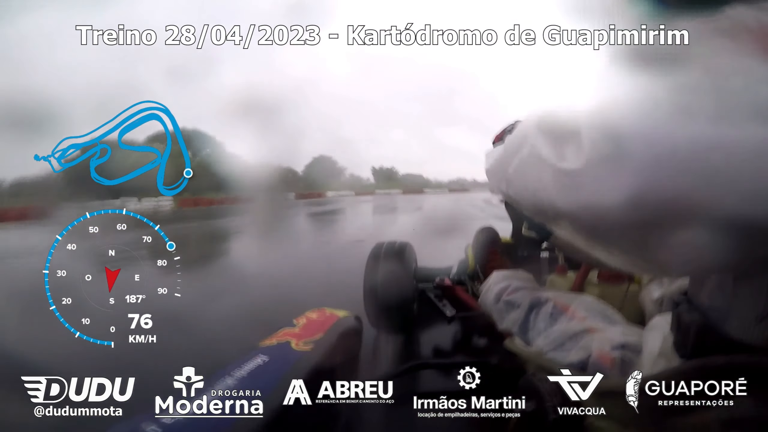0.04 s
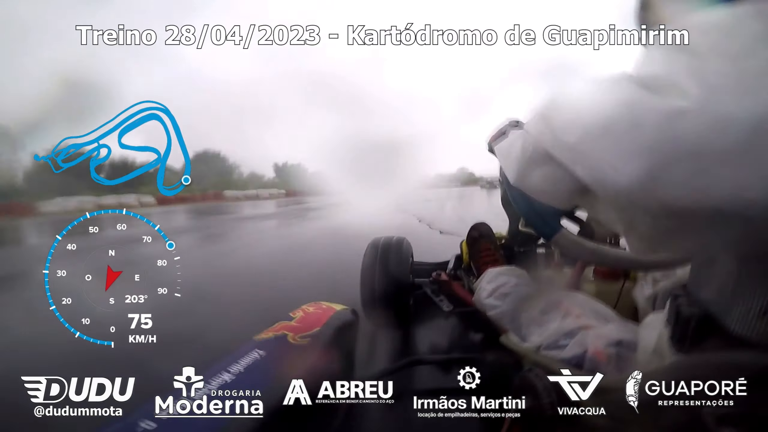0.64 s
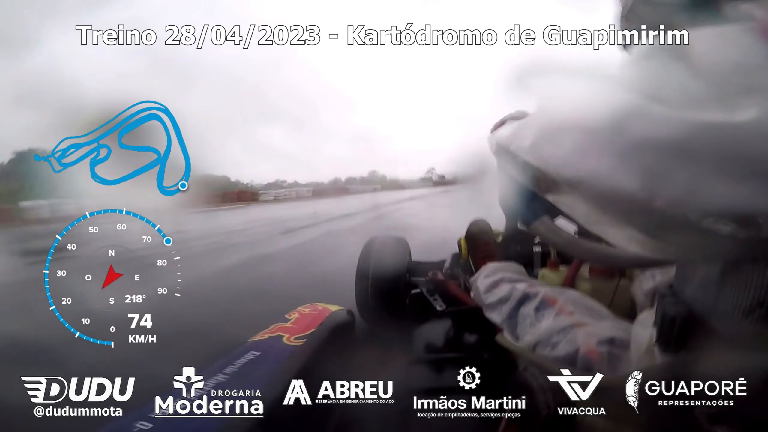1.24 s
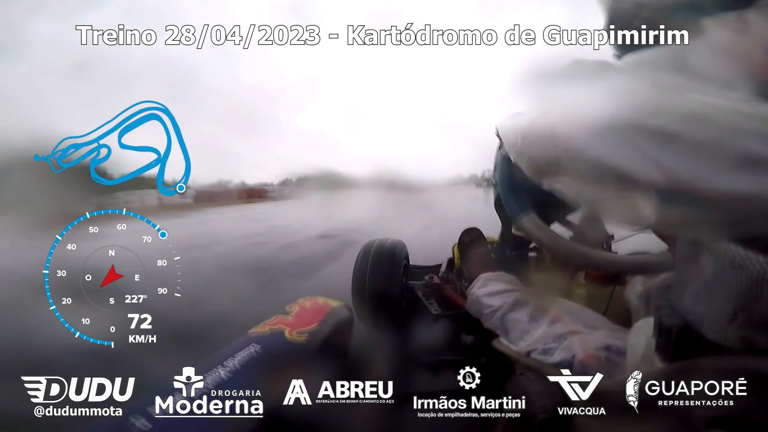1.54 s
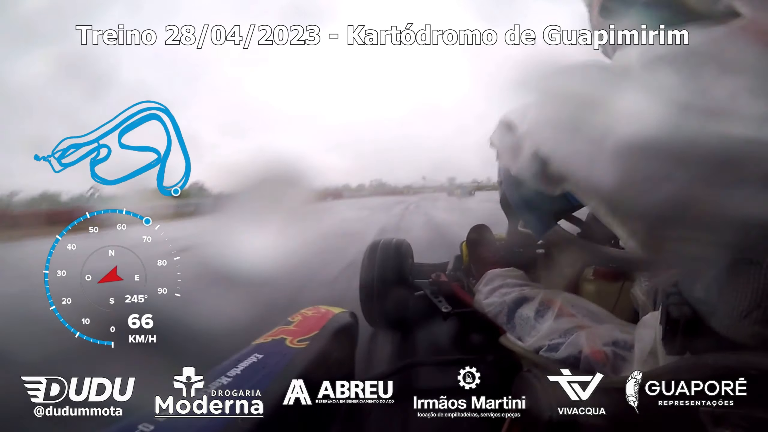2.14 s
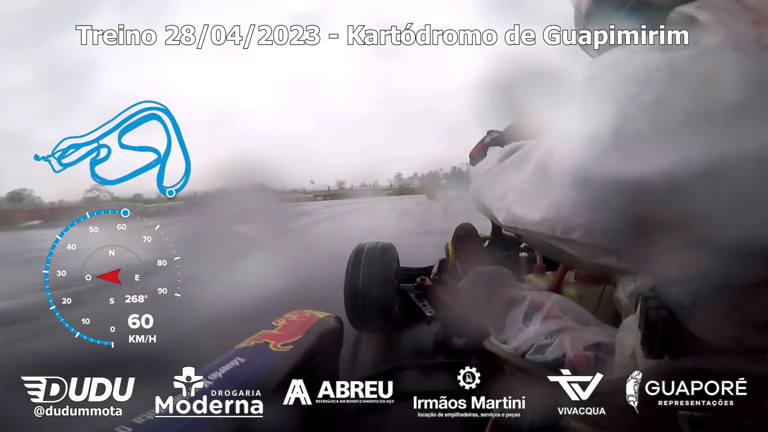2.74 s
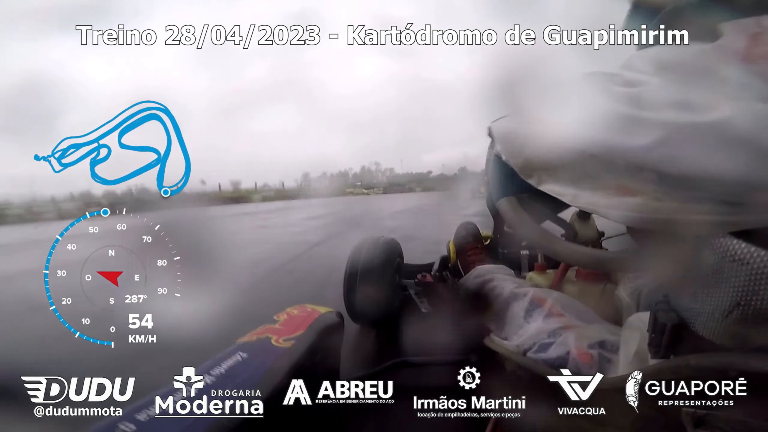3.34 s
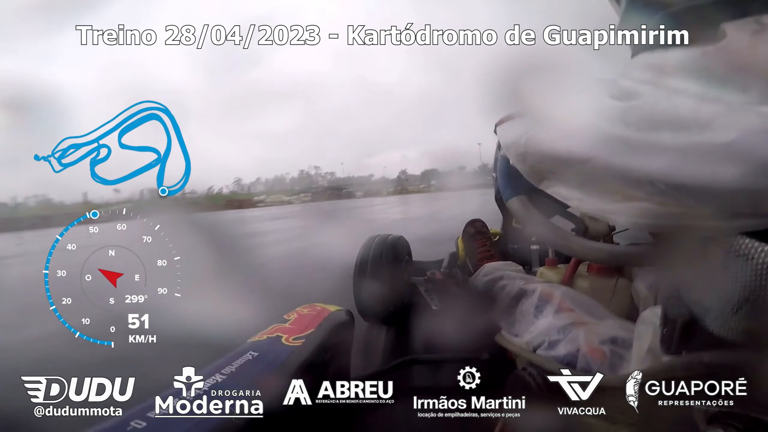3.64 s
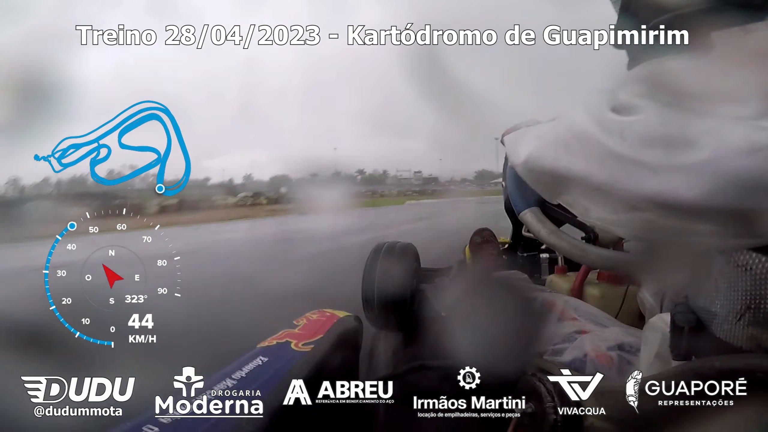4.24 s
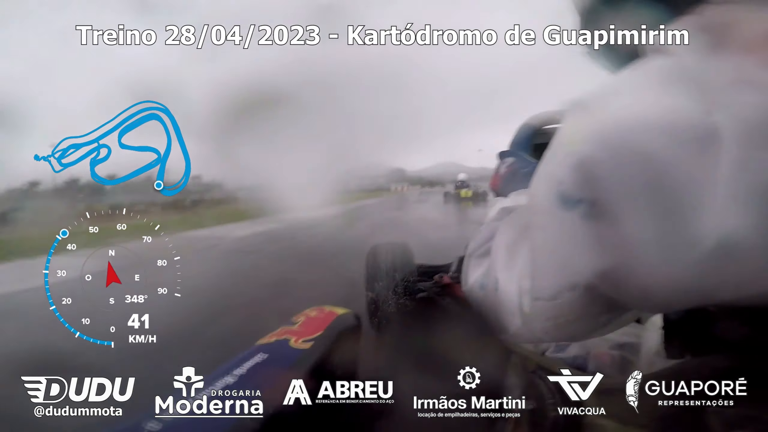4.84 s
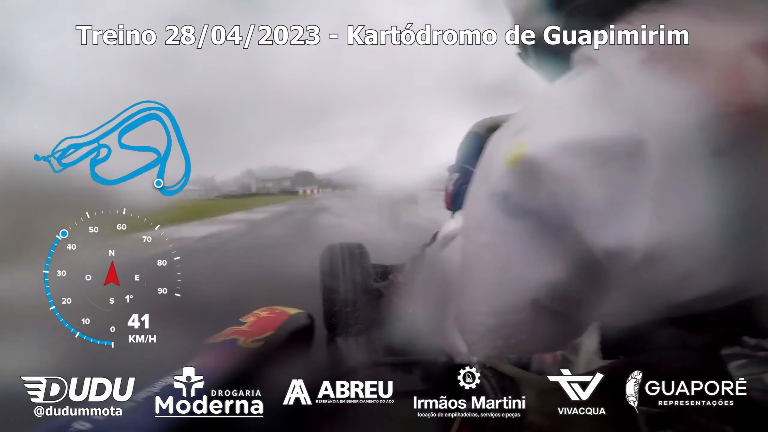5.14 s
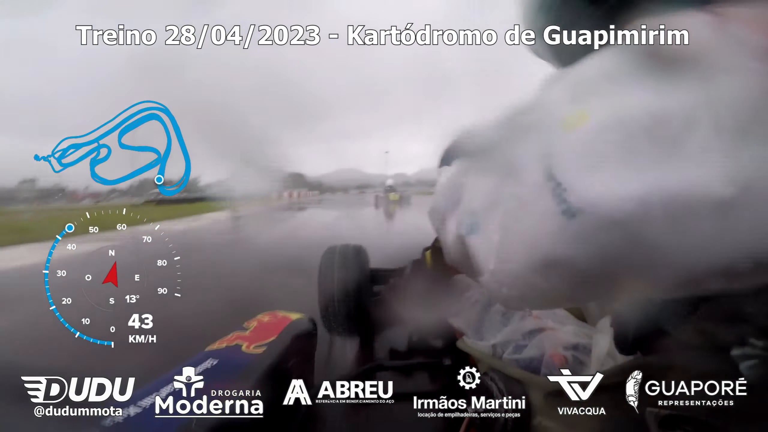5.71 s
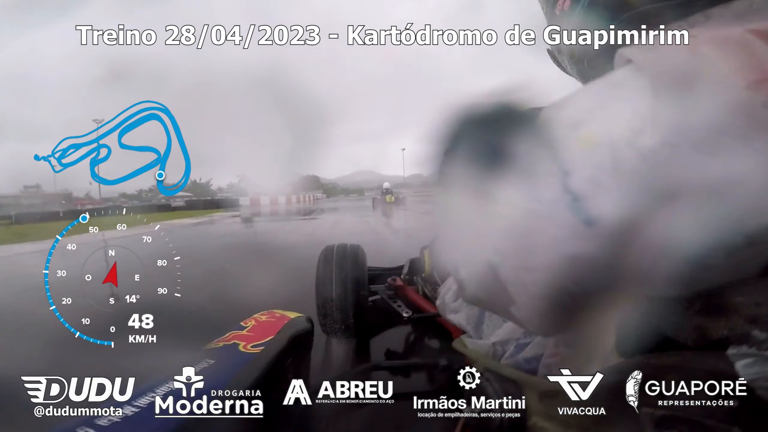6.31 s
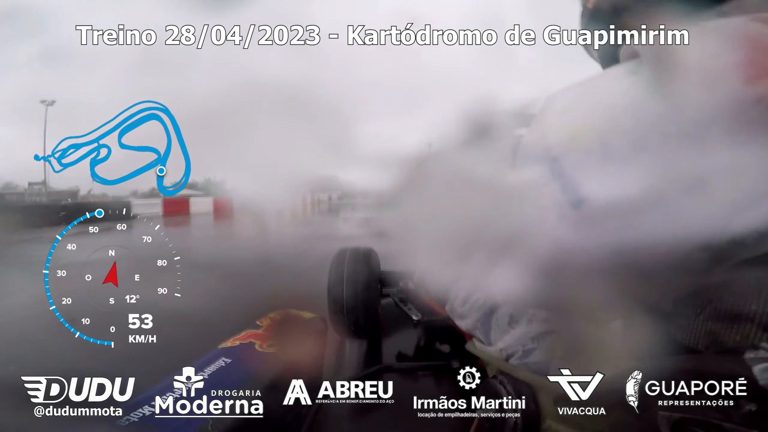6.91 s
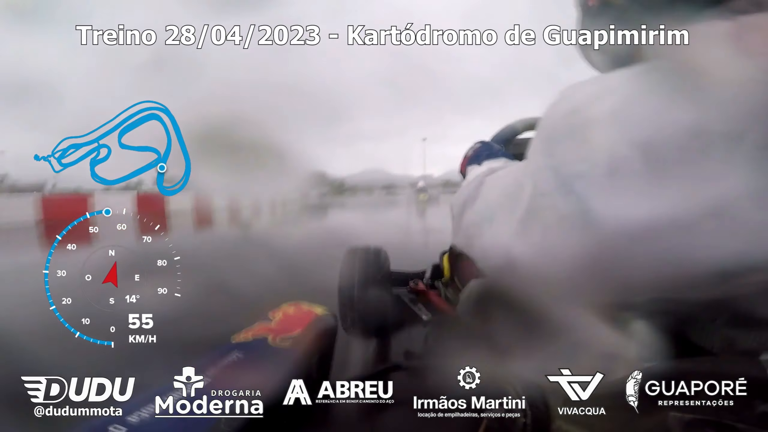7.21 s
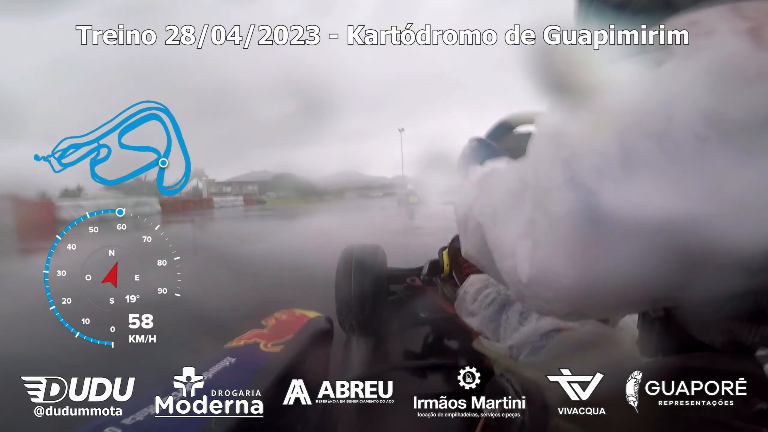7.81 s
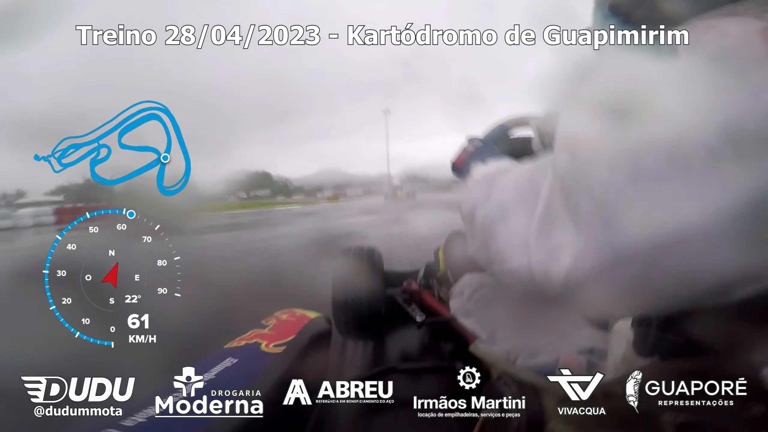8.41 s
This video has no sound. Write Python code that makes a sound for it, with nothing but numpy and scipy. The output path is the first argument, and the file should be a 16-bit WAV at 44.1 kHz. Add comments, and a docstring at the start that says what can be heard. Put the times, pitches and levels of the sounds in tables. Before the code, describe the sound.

A four-stroke racing kart engine drones on board, boxy through a waterproof camera case that chatters constantly over chain clatter and low road rumble. The revs start high, with sharp knocks from the mount during the first two seconds, the hardest at 0.3 seconds. From about 1 second the pitch sinks, and the engine goes slack near 2 seconds. A wavering metallic chain rasp and tyre scrub come forward through the bend, with dull clunks and small splashes between 3 and 4 seconds. The revs bottom out around 4.3 seconds, followed by a short wash of water underneath. From about 5.2 seconds the engine pulls away in hard, ringing chugs, rising steadily in pitch as the scrub drops away. Deep wind buffets around 7 seconds, and more knocks land just after 8 seconds. A faint wet hiss runs throughout.

```python
"""A four-stroke racing kart engine, heard on board: it slows through a long, wet bend, then pulls away.
Its firings drone through the frame and rattle a camera's waterproof case, which knocks on its mount.
The chain clatters and rasps, the tyres scrub and throw spray, and wind and asphalt rumble underneath.
Everything is heard through the case's resonances and a limiter."""
import sys
import numpy as np
from scipy.fft import rfft, irfft, next_fast_len
from scipy.io import wavfile
from scipy.ndimage import uniform_filter1d, minimum_filter1d, map_coordinates

SR = 44100
rng = np.random.default_rng(int(sys.argv[2]) if len(sys.argv) > 2 else 0)


def log_audio(samples):
    """Write samples as a 16-bit WAV file to the path given in sys.argv[1]."""
    # one column per channel
    frames = np.atleast_2d(samples).T
    # limit to full scale, then quantise
    limited = np.clip(frames, -1, 1)
    pcm = np.round(limited * 32767).astype(np.int16)
    wavfile.write(sys.argv[1], SR, pcm)


N = 373086

# The revs sink through the bend, blip, then climb. Each row: time in seconds, firings a second.
REVS = [(0, 46.42), (.9, 45.13), (1.35, 42.01), (2.0, 38.82), (2.3, 37.93), (2.6, 34.25), (3.4, 32.16),
        (3.7, 30.05), (4.0, 28.88), (4.3, 26.92), (4.65, 28.1), (5.1, 28.66), (5.28, 27), (5.5, 28.21),
        (6.1, 30.62), (7.0, 34.04), (8.46, 38.44)]
# How hard the engine pulls. Each row: time in seconds, load from 0 to 1.
LOAD = [(0, 0.31), (.8, 0.26), (1.15, 0.7), (1.45, 0.6), (1.8, 0.16), (4.25, 0.11), (4.55, 0.26),
        (5.12, 0.21), (5.3, 0.62), (6.4, 0.6), (7.1, 0.48), (7.4, 0.73), (7.9, 0.8), (8.46, 0.41)]
# How the frame colours the drone. Each row: frequency in Hz, gain in dB.
FRAME_EQ = [(25, -7), (85, -17.5), (110, -18.5), (142, -9.5), (175, -16.5), (205, -29.5), (234, -10),
            (253, 3.5), (278, 0.5), (300, -6.5), (330, -16.5), (400, -17), (600, -33)]
# The eighth harmonic eases off as the revs rise. Each row: firings a second, gain in dB.
EIGHTH_TRIM = [(32, -1), (35, -2.5)]
# The frame's answer to the crankshaft's imbalance. Each row: frequency in Hz, gain in dB.
IMBALANCE_EQ = [(54, -32), (61, -33), (67, -41), (73, -46), (77, -27.5), (84, -28.5), (92, -35), (108, -34),
                (114, -22.5), (119, -21.5), (124, -28.5), (129, -35), (143, -43), (180, -45.5)]
# The fifth harmonic stands out when the engine lugs. Each row: firings a second, level in dB.
LUGGING = [(27, -29.5), (30, -33.5), (34, -37.5)]
def engine(cycles, firing_hz, load, boom_db):
    """Firing harmonics sweep through the frame's resonances; 2 and 4 carry the crankshaft's imbalance."""
    def harmonic(k):
        flutter = amp(wobble(18))
        return flutter * np.sin(2 * np.pi * (k * cycles + rng.random()) + 0.014 * k * wobble(22))

    eighth_db = along(EIGHTH_TRIM, firing_hz)
    drone = sum(amp(along(FRAME_EQ, k * firing_hz) + (k == 8) * eighth_db) * harmonic(k)
                for k in range(1, 15) if k not in (2, 4))
    crank = sum(amp(along(IMBALANCE_EQ, k * firing_hz)) * harmonic(k) for k in (2, 4))
    lug = amp(along(LUGGING, firing_hz)) * harmonic(5)
    climb_hz_per_s = uniform_filter1d(np.gradient(curves(REVS)[0]) * SR, size=SR // 5)
    pull_db = 2.5 * np.tanh(climb_hz_per_s / 2.2)  # more throb on rising revs, less on falling
    crank_db = pull_db + 14 * np.minimum(load, .26) - 3.4 + 1.7 * wobble(16)
    return amp(boom_db - 1.5) * np.sqrt(load) * steady(drone, .12) + amp(crank_db) * crank + lug


# Firings stand apart at low revs and merge higher up. Each row: firings a second, pulsing from 0 to 1.
PULSING = [(31, 1), (34, 0.4), (42, 0.3)]
# The dry tone of spits and ticks. Each row: frequency in Hz, gain in dB.
TICK_EQ = [(1000, 4), (2000, 0), (2800, 2), (3200, -4.5), (3600, -3.5), (4100, -3), (4600, -10),
           (5600, -10), (7500, -16.5), (12500, -48)]
def putter(cycles, firing_hz, lock):
    """Pulling at low revs, each firing starts with a crisp spit, its top dulled by the mount."""
    spits = rng.standard_normal(N) * firing_gate(cycles - 0.04, decay=.15, scatter_db=1.5)
    dulled = filtered(spits, lambda hz: amp(along(TICK_EQ, hz)) / (1 + (hz / 4200) ** 4))
    return amp(-45.5) * lock * along(PULSING, firing_hz) * unit(dulled)


# How hard the kart shakes. Each row: time in seconds, case rattle and chain clatter in relative dB.
SHAKE = [(0.0, -29, -41), (1.2, -30.5, -42.5), (1.5, -31.5, -41.5), (2.1, -30, -41), (2.9, -31.5, -42.5),
         (4.3, -30.5, -43.5), (4.4, -37, -46.5), (4.6, -31.5, -43), (5.05, -33.5, -45.5),
         (5.35, -29.5, -44), (6.4, -34, -48.5), (7.0, -29, -43), (7.35, -35.5, -48), (8.25, -27.5, -42),
         (8.46, -28.5, -39)]
# The chattering case. Each row: resonance in Hz, width in Hz, gain in dB.
CASE_MODES = [(697, 120, -11.5), (1017, 107, -5.5), (1289, 194, 1), (1460, 670, -12.5), (2020, 110, -26),
              (2870, 300, -33)]
# The mount's clearest ring. Each row: resonance in Hz, width in Hz, gain in dB.
MOUNT_MODES = [(1291, 54, 8), (653, 44, 0.5)]
# The mount's rubber seat softens each contact. Each row: frequency in Hz, gain in dB.
RUBBER_EQ = [(400, -1.5), (650, 0), (2800, 1), (4500, -15.5), (9000, -25)]
def rattle(cycles, firing_hz, lock, jolt_db):
    """The case chatters on its mount: at random, or in one ringing burst per firing under load."""
    flutter_db = 0.8 * (1 - lock) * wobble(18)
    level = amp(curves(SHAKE)[0] - 2.5 + 0.9 * jolt_db + flutter_db)
    chatter = steady(ring(impacts(2000, spread_db=1), CASE_MODES), 0.11)
    pulsing = along(PULSING, firing_hz)
    contacts = impacts(5000, spread_db=1)
    gate = firing_gate(cycles + .018 * wobble(25), decay=.25, scatter_db=.8)
    bursts = unit(contacts * (1 - pulsing + pulsing * gate))
    first_blows = np.diff(np.floor(cycles - .06 + .02 * wobble(25)), prepend=0) > 0
    chug = steady(ring(bursts + amp(-4) * pulsing * unit(first_blows * 1.0), MOUNT_MODES), 0.036)
    mount = filtered(level * np.sqrt(lock) * chug + kicks(), lambda hz: 1 / (1 + (hz / 2100) ** 4))
    return equalise(level * np.sqrt(1 - lock) * chatter + mount, RUBBER_EQ)


# The hardest firings as the kart pulls away. Each row: start in seconds, strength in dB.
KICKS = [(5.179, -24.5), (5.291, -22.5), (5.512, -19), (5.688, -24), (5.894, -22), (6.059, -22),
         (6.152, -22.5), (6.219, -22), (6.286, -21), (6.409, -27), (6.536, -23.5)]
def kicks():
    """A hard firing strikes the mount once and leaves it ringing."""
    blows = np.zeros(N)
    for start, db in KICKS:
        blows[round(start * SR)] = amp(db)
    rung = ring(blows, MOUNT_MODES)
    return rung * blows.max() / np.abs(rung).max()


# Engine drone and case boom swell and sag together. Each row: time in seconds, gain in dB.
BOOM_SWELL = [(0, 0.5), (.22, 1.5), (.4, 0), (1.0, 0), (1.2, 3), (1.41, 2), (1.49, -2.5), (1.57, 3.5),
              (1.8, 1.5), (2.05, 1.5), (2.25, -1.5), (3.0, 0), (4.0, -0.5), (4.35, 1.5), (5.0, 0),
              (5.15, 2), (5.33, 1.5), (5.62, 0.5), (5.72, 0.5), (6.2, -0.5), (6.5, 3), (6.78, 0.5),
              (6.88, -4.5), (6.96, 2), (7.15, 1.5), (7.33, -3.5), (7.62, -1.5), (8.0, 2), (8.28, -1),
              (8.4, 0)]
# The case's two low notes. Each row: resonance in Hz, width in Hz, gain in dB.
BOOM_MODES = [(241, 31.8, 1.5), (292, 55, -2.5)]
# High revs favour the upper note. Each row: firings a second, its gain in dB.
BOOM_TILT = [(27, -6), (31, -1), (40, -1.5), (46, 2)]
def case_boom(firing_hz, load, boom_db):
    """Small, dense jolts boom in the case, taking over from the drone as the load drops."""
    jolts = impacts(2000, spread_db=1.5)
    notes = ring(jolts, BOOM_MODES[:1]) - amp(along(BOOM_TILT, firing_hz)) * ring(jolts, BOOM_MODES[1:])
    boom = equalise(notes, [(100, -16.0), (200, 0.0), (235, 0.5), (330, 6.0), (700, -14.0)])
    return amp(boom_db - 2.0) * np.sqrt(1 - load) * steady(boom, 0.058)


# Hard knocks of the case on its mount. Each row: start in seconds, relative level in dB.
KNOCKS = [(.053, -27), (.103, -28), (.1925, -26), (.2135, -23.5), (.227, -28), (.2795, -25), (0.3025, -14),
          (.324, -32), (.4115, -31), (.4325, -25.5), (.641, -27), (.873, -24.5), (.883, -28),
          (.9405, -27.5), (.984, -29), (1.1209, -24), (1.191, -22.5), (1.2485, -23.5), (1.2724, -18.5),
          (1.3075, -23), (1.3443, -24), (1.4155, -24), (1.5635, -26), (1.6615, -26), (1.6845, -24.5),
          (1.797, -29), (1.8233, -25), (1.835, -31), (1.8475, -26), (1.923, -22.5), (2.1175, -25),
          (2.2205, -26), (5.328, -21), (5.3641, -23.5), (5.4713, -28), (5.541, -24), (5.7851, -24),
          (5.9869, -25), (6.6648, -24), (7.1845, -23), (8.0205, -26.5), (8.1785, -26), (8.2773, -21),
          (8.304, -20.5), (8.408, -16.5), (8.42, -22)]
# The shell's bright clack. Each row: resonance in Hz, width in Hz, gain in dB.
SHELL_MODES = [(1280, 320, 1.5), (2400, 720, -5.5), (2866, 160, 4), (3510, 390, -2.5), (3880, 430, 2),
               (4840, 320, -12.5), (5570, 340, -12.5), (6700, 1200, -21), (8150, 1400, -43),
               (12400, 800, -54.5)]
# Knocks are full at low revs, thin at speed. Each row: firings a second, gain of their body in dB.
KNOCK_BODY = [(30, -1), (38, -3.5), (42, -4)]
def knocks(firing_hz):
    """The case hits its mount and the shell rings."""
    shell = ring(contact_bursts(KNOCKS), SHELL_MODES)
    clacks = amp(22) * equalise(shell, [(900, 15.5), (2500, 0), (8000, -6)])
    body = filtered(clacks, lambda hz: 1 / (1 + (hz / 2300) ** 6))
    return clacks - body + amp(along(KNOCK_BODY, firing_hz)) * body


# Light knocks crowd in at speed. Each row: firings a second, average taps a second.
TAP_RATE = [(28, 1.5), (38, 2), (45, 8)]
# Their dry click. Each row: frequency in Hz, gain in dB.
TAP_EQ = [(300, 28.5), (700, 23), (1300, 27), (2000, 21.5), (2800, 23.5), (3250, 15), (4000, 16.5),
          (5200, 5), (8000, 0), (11000, -14)]
def taps(firing_hz):
    """Light knocks land at random and only click."""
    starts = np.flatnonzero(rng.random(N) < along(TAP_RATE, firing_hz) / SR) / SR
    levels_db = -33.5 + rng.standard_normal(len(starts))
    return equalise(contact_bursts(zip(starts, levels_db)), TAP_EQ)


# Dull clunks. Each row: start in seconds, level in dB.
CLUNKS = [(2.038, -26), (3.03, -26), (3.643, -25.5), (3.657, -26.5), (4.203, -28.5), (4.312, -25.5),
          (4.433, -27), (6.628, -25), (7.097, -24), (7.113, -27.5), (7.77, -29.5)]
# The bracket's hollow tone. Each row: resonance in Hz, width in Hz, gain in dB.
BRACKET_MODES = [(660, 82, 0.5), (1050, 130, -3), (1300, 150, -1), (1730, 250, -11.5)]
def clunks(rise_s=0.0033):
    """The mount bottoms out: a short, dull burst in the bracket's resonances."""
    envelope = np.zeros(N)
    for start, db in CLUNKS:
        age = np.maximum(np.arange(N) / SR - start, 0) / rise_s
        envelope += amp(db) * age * np.exp(1 - np.minimum(age, 60))
    return envelope * steady(ring(rng.standard_normal(N), BRACKET_MODES), 0.013)


# Short scrapes. Each row: middle in seconds, half length in seconds, level in dB.
SCRAPES = [(6.754, .007, -39), (6.784, 0.011, -40), (7.06, .016, -33.5), (7.102, .024, -38),
           (7.886, 0.011, -40)]
# Their gritty tone. Each row: frequency in Hz, gain in dB.
SCRAPE_EQ = [(500, -11), (1100, 11.5), (2000, -4.5), (2800, 2), (3200, -3.5), (3900, 1), (4600, -10.5),
             (6500, -16.5), (10000, -30.5)]
def scrapes(judder_hz=75.1):
    """The case sticks and slips along its mount in quick, uneven judders."""
    slips = firing_gate(judder_hz * np.arange(N) / SR + .2 * wobble(30), decay=.5, scatter_db=1.5)
    grit = unit(equalise(rng.standard_normal(N) * slips, SCRAPE_EQ))
    return grit * sum(amp(db) * swell(middle, half_s) for middle, half_s, db in SCRAPES)


# The bright clatter of the links. Each row: frequency in Hz, gain in dB.
CHAIN_EQ = [(1500, -19.5), (2300, 7.5), (2600, 2.5), (2850, 0.5), (3200, -13.5), (3550, -3.5), (3950, 2),
            (4180, 0), (4420, -11), (4750, -5.5), (5200, -15), (5600, -9), (6500, -15.5), (9000, -40)]
def chain_clatter(cycles, lock, jolt_db):
    """The chain clicks unevenly, snatched by some of the firings when the engine pulls."""
    snatch = 9 + 1.8 * lock * firing_gate(cycles + 0.036 * wobble(25), decay=0.2, scatter_db=8.0)
    links = impacts(6000, spread_db=1.5) * amp(2.96 * wobble(170)) * snatch
    return amp(curves(SHAKE)[1] - 5.5 + 0.79 * jolt_db) * steady(equalise(links, CHAIN_EQ), 0.11)


# The rasp peaks as the kart drives the engine in the bend. Each row: time in seconds, level in dB.
RASP_LEVEL = [(0, -37), (1.6, -37), (2.3, -35), (3.6, -38.5), (4.3, -41), (4.5, -48), (7.2, -42.5),
              (8.46, -39.5)]
# How the case colours the rasp. Each row: frequency in Hz, gain in dB.
RASP_EQ = [(800, -16.5), (1050, -2), (1300, 8.5), (1550, -4), (1820, -8.5), (2000, -22), (2400, -17),
           (3000, -25)]
def chain_rasp(cycles, jolt_db, teeth_per_firing=40):
    """The clutch sprocket's tooth rate and its crankshaft sidebands make a wavering metallic chord."""
    slack_cycles = cycles + 0.0015 * wobble(14)
    chord = np.zeros(N)
    for sideband in range(-8, 9):
        level = amp(-2 * abs(sideband) + 3.4 * wobble(8))
        order = teeth_per_firing + 2 * sideband
        chord += level * np.sin(2 * np.pi * (order * slack_cycles + rng.random()))
    return amp(curves(RASP_LEVEL)[0] + 0.8 * jolt_db) * unit(equalise(chord, RASP_EQ))


# Ticking comes forward at high revs. Each row: firings a second, level in dB.
TICK_LEVEL = [(28, -62.5), (35, -61.5), (39, -49.5), (46, -48)]
def ticks(cycles, firing_hz, jolt_db):
    """Loose parts tick at each crankshaft turn, twice a firing, some much harder than others."""
    contacts = rng.standard_normal(N) * np.minimum(firing_gate(2 * cycles, decay=.16, scatter_db=3.5), 6)
    return amp(along(TICK_LEVEL, firing_hz) + .6 * jolt_db) * unit(equalise(contacts, TICK_EQ))


# How hard the tyres corner. Each row: time in seconds, relative scrub level in dB.
SCRUB_LEVEL = [(0, -37.5), (1.3, -41), (1.9, -32.5), (2.4, -34.5), (2.8, -29.5), (3.6, -30), (4.3, -28.5),
               (4.42, -33.5), (4.9, -36), (5.3, -58), (7.5, -42), (8.46, -35.5)]
# The voice of the sliding tread. Each row: resonance in Hz, width in Hz, gain in dB.
TYRE_MODES = [(390, 77, 18.5), (691, 56, 9), (1276, 234, 4.5), (1595, 34, 2.5), (1713, 94, 3),
              (2510, 180, -5)]
# Trims the scrub down to its resonances. Each row: frequency in Hz, gain in dB.
SCRUB_EQ = [(120, -15.5), (330, 4), (450, 0), (580, -18.5), (670, -2), (1850, 2.5), (1970, -21),
            (2300, -1.5), (3000, -8), (6000, -30.5), (10000, -49.5)]
def tyre_scrub(slip_hz=299.5):
    """The tread sticks and slips at an unsteady rate, over smooth friction noise."""
    slip_cycles = np.cumsum(slip_hz * np.exp(.11 * wobble(35))) / SR
    slips = np.diff(np.floor(slip_cycles), prepend=0)
    tread = ring(rng.standard_normal(N) + amp(-2) * unit(slips), TYRE_MODES)
    return amp(curves(SCRUB_LEVEL)[0] + 1.0 + 2.2 * wobble(110)) * unit(equalise(tread, SCRUB_EQ))


# Water off the tyres. Each row: time in seconds, relative level in dB.
SPRAY_LEVEL = [(0.0, -51), (0.5, -53), (1.3, -54.5), (1.9, -58.5), (2.55, -55.5), (2.85, -61.5),
               (3.1, -54.5), (4.3, -55), (4.55, -50.5), (5.0, -48.5), (5.25, -53.5), (6.5, -56.5),
               (7.9, -57), (8.46, -53)]
# Puddles in the bend. Each row: middle in seconds, extra spray in dB.
PUDDLES = [(3.03, 8.5), (3.19, 6), (3.39, 4), (3.63, 4.5), (3.76, 5), (3.98, 3)]
# The spray's tone. Each row: frequency in Hz, gain in dB.
SPRAY_EQ = [(1500, -4.5), (3200, -12.5), (3900, -4), (4400, 1), (4800, 6.5), (5200, -3.5), (5600, 4),
            (6300, -0.5), (7000, -3), (8400, -6.5), (10000, -12.5), (11300, -17), (12500, -35),
            (14000, -46)]
# Scrub sets how much the water surges. Each row: scrub level in dB, signed swing in dB.
SURGE_DEPTH = [(-55, -2), (-40.5, 2.5), (-25, -3)]
# A faint hiss near 12 kHz that swells and fades. Each row: time in seconds, relative level in dB.
HISS_LEVEL = [(0.0, -94), (1.6, -93.5), (3.0, -87.5), (3.7, -77), (4.55, -80), (5.25, -94.5), (6.7, -82.5),
              (7.9, -78.5), (8.46, -85.5)]
# Its narrow band. Each row: frequency in Hz, gain in dB.
HISS_EQ = [(10500, -34.5), (12000, -0.5), (12800, -1.5), (14000, -21.5)]
# Standing water drums on the floor tray as the bend ends. Each row: frequency in Hz, gain in dB.
WASH_EQ = [(100, -23), (380, -8.5), (490, 2), (580, -13), (670, -4), (850, -13), (1300, -19), (2000, -23.5),
           (2400, -18.5), (3200, -39), (8000, -61.5)]
def spray(jolt_db):
    """The tyres throw surging water and droplets ping on the case. A faint high hiss sits on top."""
    puddles_db = sum(db * swell(middle, half_s=0.045) for middle, db in PUDDLES)
    spray_db = curves(SPRAY_LEVEL)[0] + .4 * np.minimum(jolt_db, 0) + puddles_db
    droplets = rng.standard_normal(N) + 1.5 * unit(impacts(900, spread_db=3.5))
    water = unit(equalise(droplets, SPRAY_EQ))
    pings = unit(ring(impacts(25, spread_db=1.5), [(5630, 96, -0.5), (3980, 130, -11.0)]))
    depth_db = np.interp(curves(SCRUB_LEVEL)[0], *np.transpose(SURGE_DEPTH))
    surge_db = depth_db * wobble(22) + 2.0 * wobble(70)
    hiss = amp(curves(HISS_LEVEL)[0] + 6.5 + 1.6 * surge_db) * rush(HISS_EQ)
    wash = amp(-36.5 + surge_db) * swell(4.7, half_s=0.46) * rush(WASH_EQ)
    return amp(spray_db - 3.5 + surge_db) * water + amp(spray_db - 9.0) * pings + hiss + wash


# Wind on the case. Each row: time in seconds, relative level in dB.
WIND_LEVEL = [(0.0, -32), (1.6, -25), (2.85, -26), (3.05, -23), (4.3, -25), (6.25, -34), (6.6, -20.5),
              (7.25, -19.5), (7.6, -30.5), (8.46, -20.5)]
# Its deep buffeting. Each row: frequency in Hz, gain in dB.
BUFFET_EQ = [(10, -24), (24, -6.5), (31, -11), (36, 5), (43, -3), (52, -16.5), (75, -28), (150, -55.5),
             (400, -100)]
# The hum of the swaying frame. Each row: resonance in Hz, width in Hz, gain in dB.
SWAY_MODES = [(113.4, 3.3, 0)]
def wind(jolt_db):
    """Wind rocks the mount and sways the frame."""
    wind_db = curves(WIND_LEVEL)[0] + 0.5 * jolt_db
    buffet = amp(wind_db - 1.1 + 2.6 * wobble(14)) * steady(rush(BUFFET_EQ), .12)
    sway = amp(wind_db - 11.0) * steady(ring(rng.standard_normal(N), SWAY_MODES), 0.67)
    return buffet + sway


# The low bed of road noise. Each row: frequency in Hz, gain in dB.
ROAD_EQ = [(30, -14.5), (70, -8), (95, -3.5), (130, 3), (178, 4.5), (215, -1), (300, -1.5), (385, -1.5),
           (430, -2), (505, -3), (590, -14.5), (670, -13.5), (770, -14), (870, -23.5), (1000, -11),
           (1500, -64.5)]
def road(firing_hz, load):
    """The asphalt rumbles, growing with speed and receding under load."""
    speed_db = 0.1153 * (firing_hz - firing_hz.mean())
    return amp(-28.2 + speed_db - 6 * load + 2.42 * wobble(25)) * steady(rush(ROAD_EQ), 0.21)


# Bumps in the track. Each row: time in seconds, strength from 0 to 1.
BUMPS = [(.295, 1), (7.08, 0.3), (8.29, 0.3)]
def bumps(depth_db=7, half_s=0.02, dip_delay_s=0.054):
    """A gain curve in dB: a short jolt, then a brief dip in loudness."""
    return depth_db * sum(strength * (swell(s, half_s) - swell(s + dip_delay_s, half_s))
                          for s, strength in BUMPS)


def amp(db):
    """Decibels to gain."""
    return 10 ** (np.asarray(db) / 20)


def unit(x):
    """Scale to rms 1."""
    return x / np.sqrt(np.mean(x ** 2) + 1e-20)


def along(points, hz):
    """Read (Hz, value) points on a log axis."""
    point_hz, values = np.transpose(points)
    return np.interp(np.log(hz + 1), np.log(point_hz + 1), values)


def curves(rows):
    """One value per sample for each column after the time."""
    times, *columns = np.transpose(rows)
    return [np.interp(np.arange(N) / SR, times, column) for column in columns]


def wobble(rate):
    """A smooth random curve, rate knots a second."""
    knots = rng.standard_normal(int(N * rate / SR) + 4)
    return map_coordinates(knots, [np.arange(N) * rate / SR], mode="mirror")


def swell(middle_s, half_s):
    """A bell-shaped envelope of height 1."""
    return np.exp(-((np.arange(N) / SR - middle_s) / half_s) ** 2)


def filtered(x, response):
    """Shape x by a complex frequency response."""
    size = next_fast_len(N + SR // 2)
    return irfft(rfft(x, size) * response(np.fft.rfftfreq(size, 1 / SR)), size)[:N]


def equalise(x, eq):
    """Colour x with a curve of (Hz, dB) points."""
    return filtered(x, lambda hz: amp(along(eq, hz)))


def rush(eq):
    """Coloured noise of rms 1."""
    return unit(equalise(rng.standard_normal(N), eq))


def ring(x, modes):
    """Play x through parallel resonances of alternating polarity."""
    return filtered(x, lambda hz: sum(
        (-1) ** k * amp(db) * 1j * hz * width / (centre ** 2 - hz ** 2 + 1j * hz * width)
        for k, (centre, width, db) in enumerate(modes)))


def steady(x, seconds):
    """Hold x at rms 1 over the given time, keeping its faster flutter."""
    size = int(seconds * SR)
    power = uniform_filter1d(uniform_filter1d(x ** 2, size), size)
    return x / np.sqrt(np.abs(power) + 1e-12)


def impacts(rate, spread_db):
    """Random impulses of uneven size, rate a second."""
    hits = (rng.random(N) < rate / SR) * rng.choice([-1, 1], N)
    return hits * amp(spread_db * np.clip(rng.standard_normal(N), -2, 2))


def contact_bursts(rows, rise_s=0.0013):
    """A few milliseconds of tiny contacts for each (seconds, dB) row."""
    t = np.arange(SR // 40) / SR
    burst = t * np.exp(-t / rise_s)
    envelope = np.zeros(N + SR)
    for start, db in rows:
        envelope[round(start * SR):][:len(t)] += amp(db) * burst / np.linalg.norm(burst)
    return rng.choice([-1, 1], N) * envelope[:N]


def firing_gate(cycles, decay, scatter_db):
    """An envelope that fires once a cycle, never equally hard; decay is a share of the cycle."""
    strengths = amp(scatter_db * rng.standard_normal(1000))
    return unit(strengths[cycles.astype(int) % len(strengths)] * np.exp(-(cycles % 1) / decay))


def limiter(x, ceiling, hold_s):
    """Turn the gain down around every peak that would pass the ceiling."""
    size = int(hold_s * SR)
    gain = np.minimum(1, ceiling / (np.abs(x) + 1e-9))
    return x * uniform_filter1d(minimum_filter1d(gain, size), size)


# The rattle locks best to slow firings. Each row: firings a second, locked share per unit of load.
LOCK_PER_LOAD = [(30, 1.1), (36, 0.89), (42, 0.25)]
def scene():
    """The on-board mix: revs, load and bumps drive the kart's parts."""
    firing_hz = curves(REVS)[0] * (1 + 0.001983 * wobble(9))
    cycles = np.cumsum(firing_hz) / SR - .26  # starting phase of the firing cycle
    load = curves(LOAD)[0]
    lock = np.clip(load * along(LOCK_PER_LOAD, firing_hz), 0, 1)  # share of rattle in time with firings
    jolt_db = bumps()
    boom_db = -20.5 + curves(BOOM_SWELL)[0] + 1.4 * wobble(10) + 0.57 * jolt_db
    mix = engine(cycles, firing_hz, load, boom_db) + rattle(cycles, firing_hz, lock, jolt_db)
    mix += chain_clatter(cycles, lock, jolt_db) + chain_rasp(cycles, jolt_db)
    mix += putter(cycles, firing_hz, lock) + ticks(cycles, firing_hz, jolt_db) + scrapes() + clunks()
    mix += wind(jolt_db) + case_boom(firing_hz, load, boom_db) + road(firing_hz, load)
    mix += tyre_scrub() + spray(jolt_db)
    mix += knocks(firing_hz) + taps(firing_hz)
    return mix[None]


# Narrow peaks and dips that the case puts on everything. Each row: frequency in Hz, gain in dB.
CASE_EQ = [(185, 0), (205, -3), (228, 0), (550, 0), (590, -0.5), (630, 0), (2550, 0), (2680, -3),
           (2800, 1.5), (2980, -1.5), (3190, -3), (3380, 1), (3900, -1), (4150, 0.5), (4380, -2.5),
           (4650, 0.5), (4900, -1)]
def record(dry):
    """The sealed case colours and muffles the sound; the camera limits the peaks and cuts the top."""
    muffle_eq = [(9000, 2), (11200, -9.0), (12500, -9.0), (13500, -18.0)]
    muffled = filtered(dry[0], lambda hz: amp(along(CASE_EQ, hz) + along(muffle_eq, hz)))
    limited = limiter(muffled * amp(1.0), ceiling=0.38, hold_s=0.023)
    return filtered(limited, lambda hz: hz < 13500)[None]


dry = scene()
out = record(dry)
log_audio(out)
```